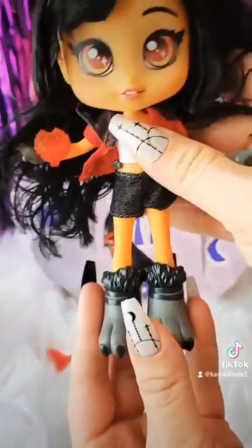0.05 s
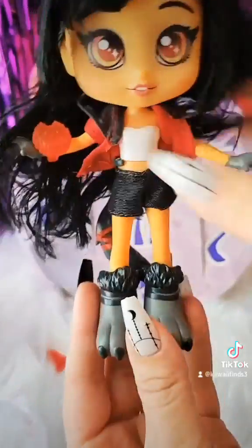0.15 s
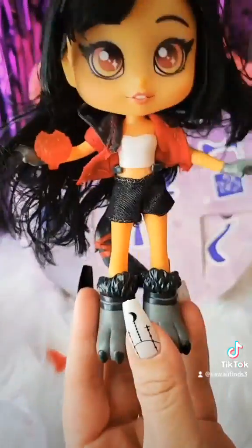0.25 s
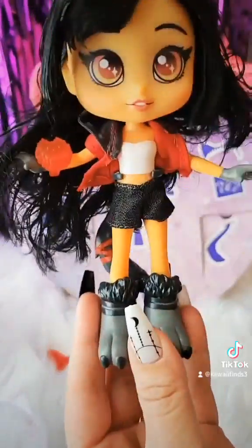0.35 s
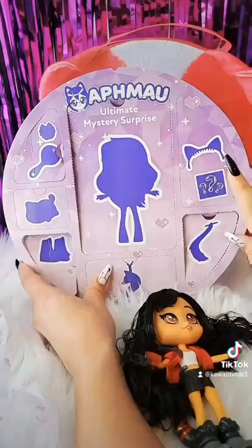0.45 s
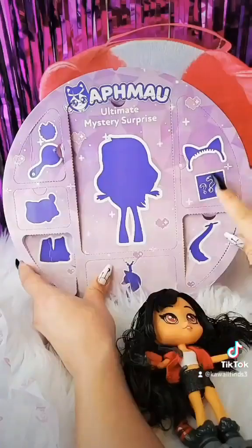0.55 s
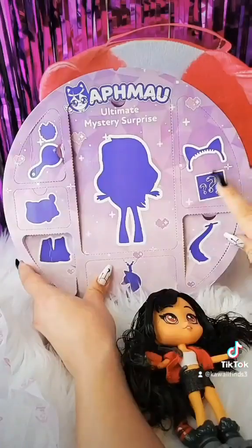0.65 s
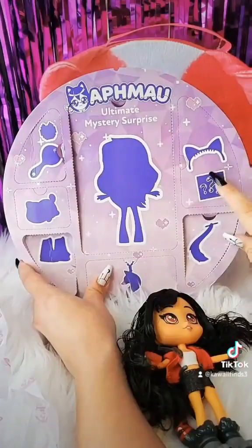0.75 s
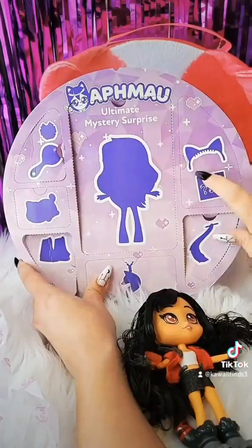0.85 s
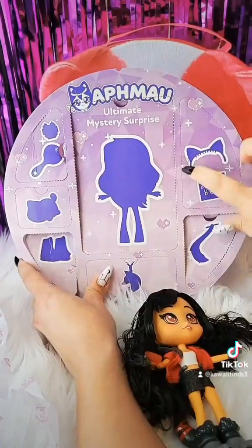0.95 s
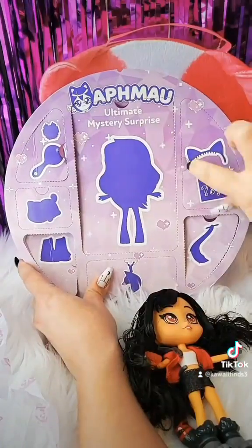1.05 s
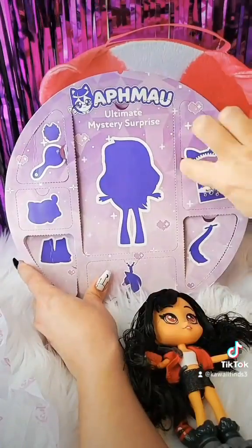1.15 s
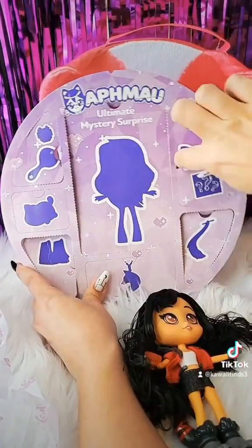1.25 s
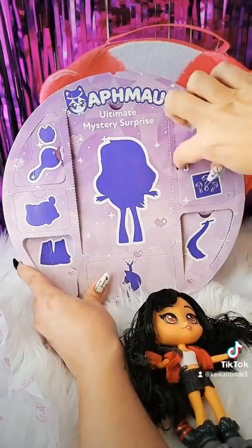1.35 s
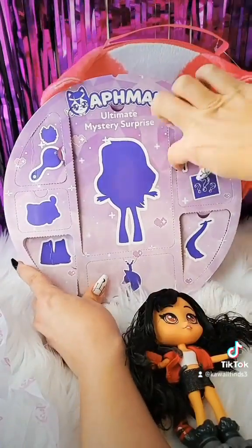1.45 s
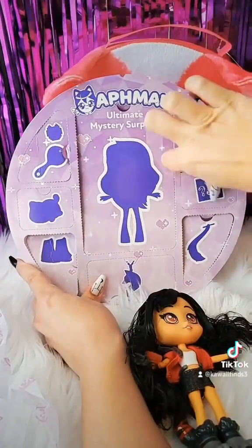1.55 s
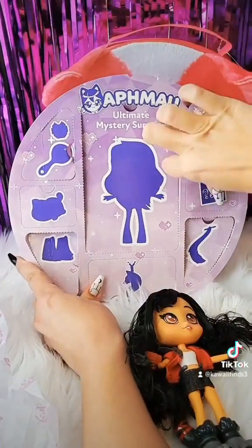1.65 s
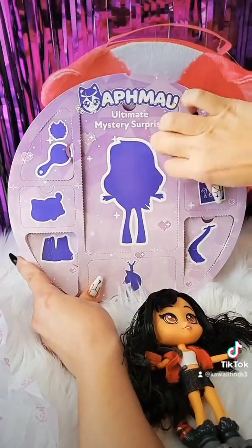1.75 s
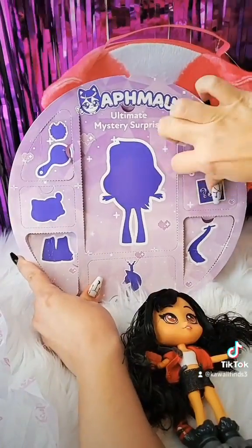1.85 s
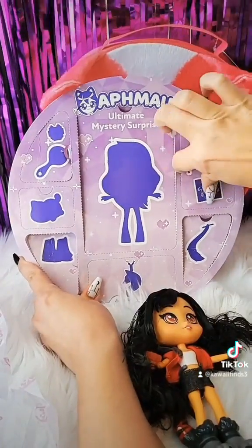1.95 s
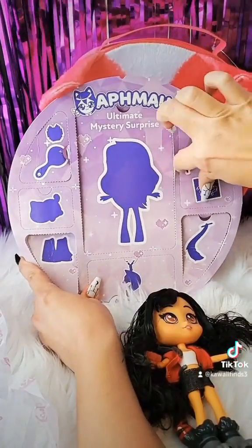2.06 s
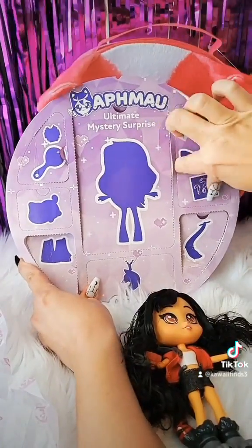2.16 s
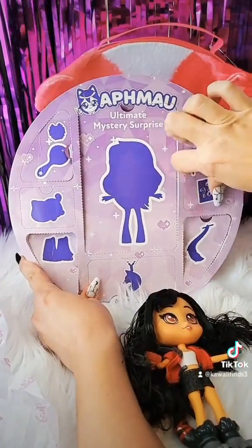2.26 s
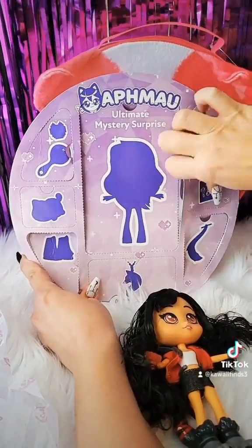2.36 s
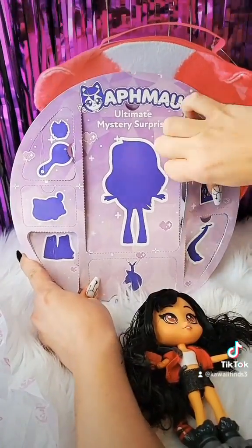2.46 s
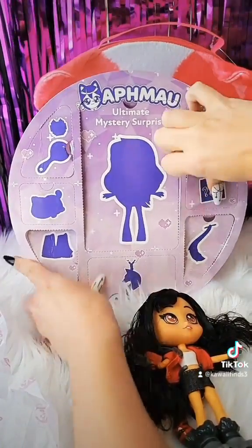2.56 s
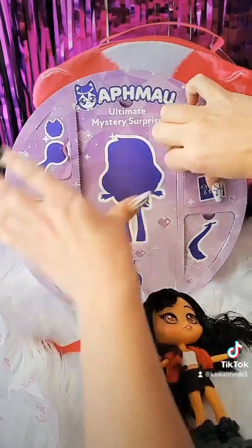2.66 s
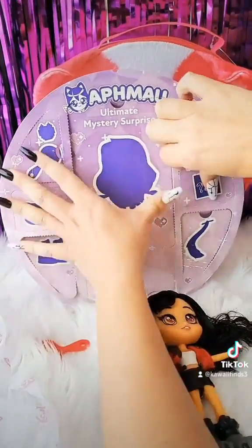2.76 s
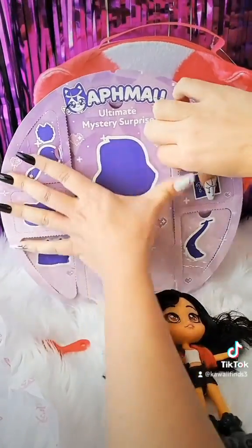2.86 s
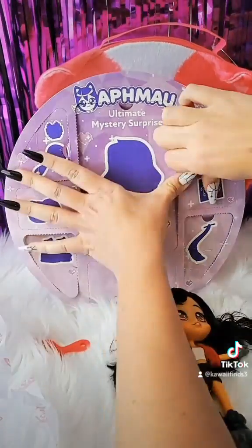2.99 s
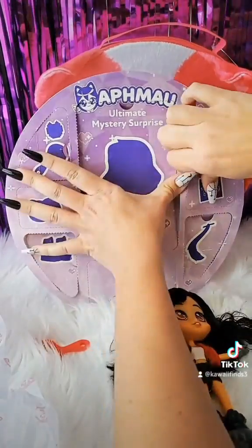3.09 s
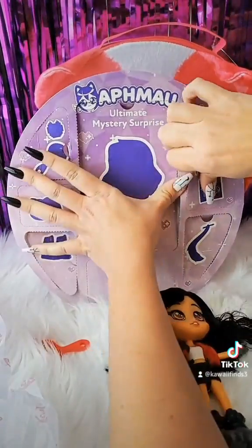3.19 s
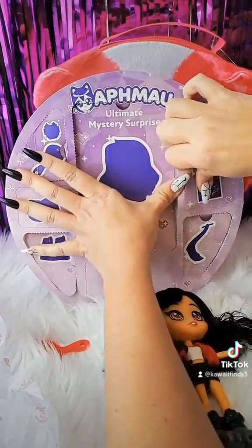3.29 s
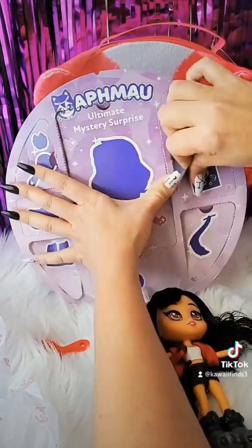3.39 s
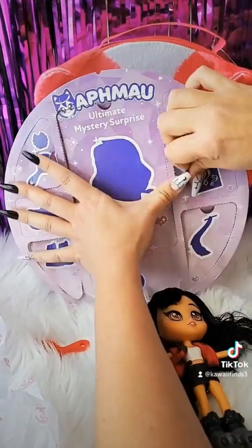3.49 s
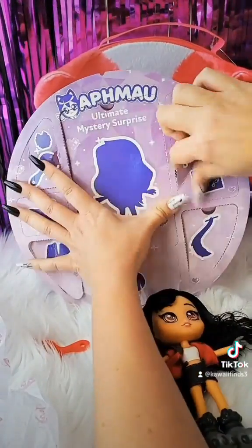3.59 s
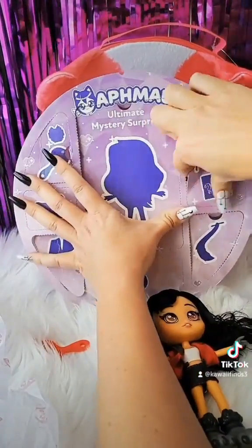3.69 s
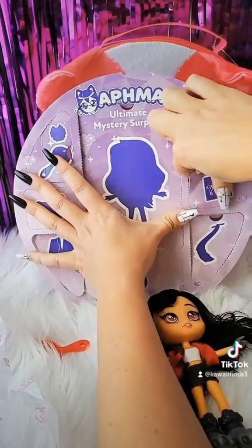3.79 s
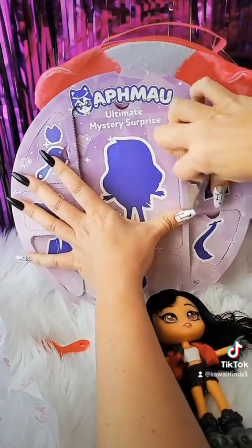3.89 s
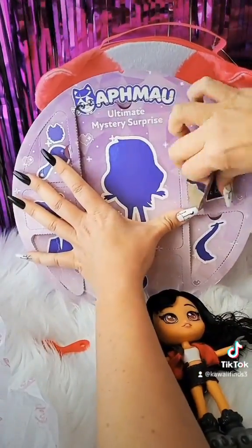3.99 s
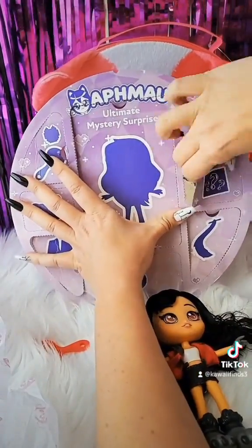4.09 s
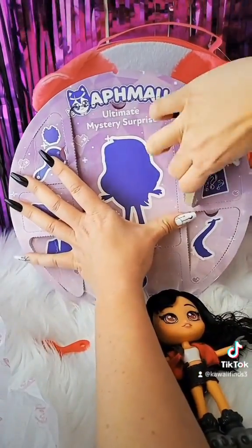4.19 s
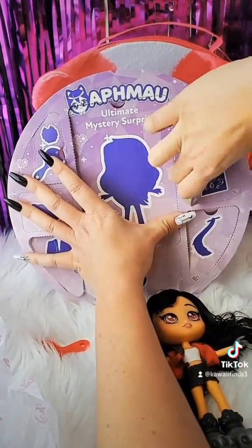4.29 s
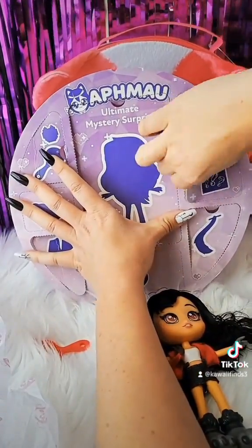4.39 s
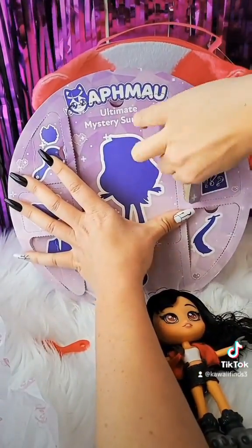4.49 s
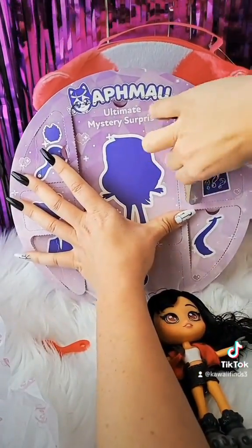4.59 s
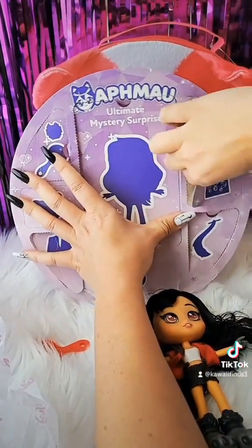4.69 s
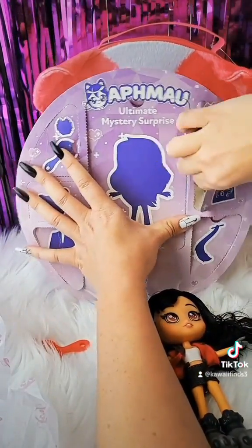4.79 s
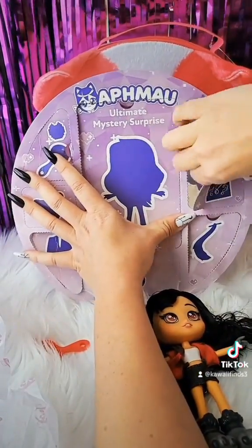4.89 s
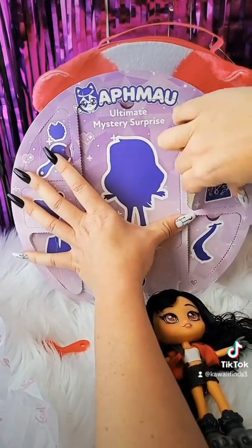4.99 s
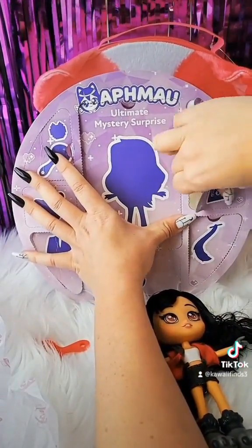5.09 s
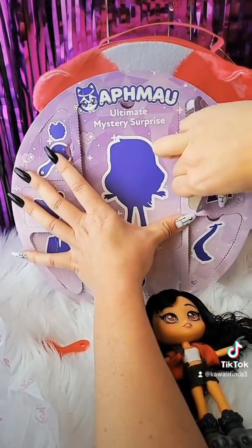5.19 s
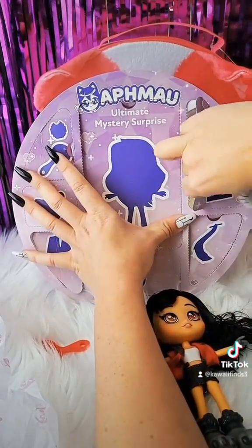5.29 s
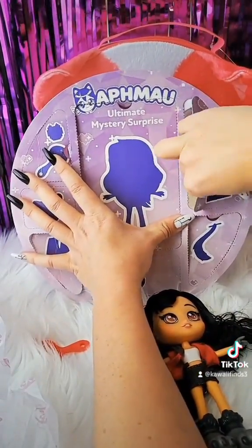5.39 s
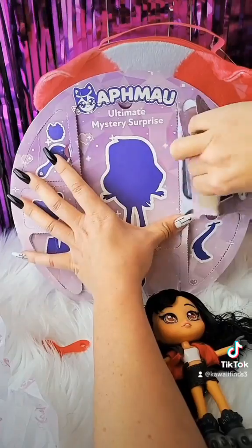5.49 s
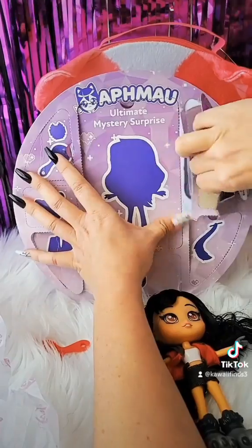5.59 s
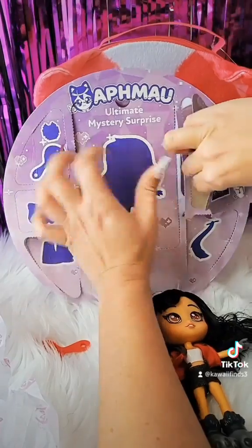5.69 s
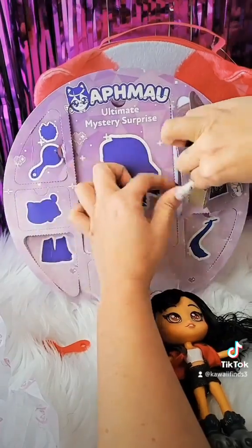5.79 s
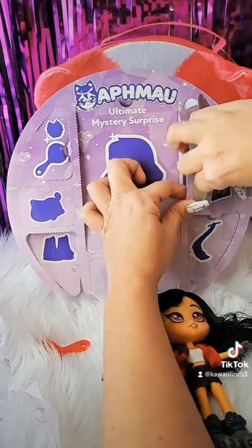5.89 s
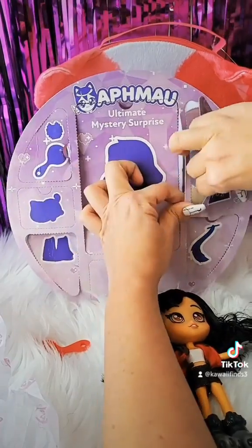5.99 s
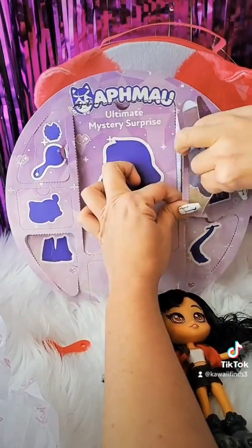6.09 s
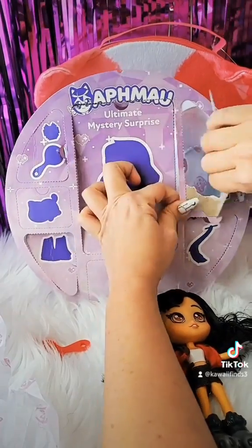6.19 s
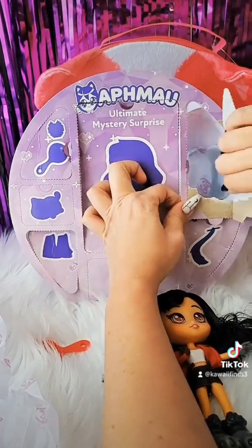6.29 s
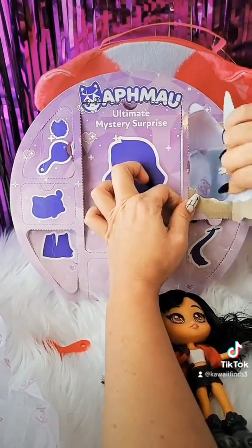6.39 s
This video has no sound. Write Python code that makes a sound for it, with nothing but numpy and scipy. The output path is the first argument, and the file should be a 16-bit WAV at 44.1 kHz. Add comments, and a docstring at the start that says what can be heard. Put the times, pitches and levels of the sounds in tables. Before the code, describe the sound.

Close cardboard handling: sharp nail taps, papery rubbing, then crisp perforation snaps and short fibrous tears, with scratchy dragging and a final click.

```python
"""Perforated card door torn open

Long fingernails tap a cardboard toy box, press in a perforated door and pull it open, in a quiet room.
Each snap is a burst of breaking fibres that rings the door and the hollow box; nail clicks ring it too.
Fingers rub by stick and slip, the door slips at every snap, torn edges catch, and peeling paper hisses.
Sine thumps flex the whole box; steady noise and a slowly changing rumble lie beneath.
"""
import sys
import numpy as np
from scipy import signal
from scipy.fft import rfft, irfft, next_fast_len
from scipy.io import wavfile

SR = 44100
rng = np.random.default_rng(int(sys.argv[2]) if len(sys.argv) > 2 else 0)


def generate_wav(signal):
    """Clip the signal to [-1, 1] and save it as 16-bit WAV at the path in sys.argv[1]."""
    frames = np.transpose(np.atleast_2d(signal))
    scaled = np.clip(frames, -1, 1) * 32767
    pcm = np.round(scaled).astype(np.int16)
    wavfile.write(sys.argv[1], SR, pcm)


N = 284445

# steady room noise, relative spectral density: f/Hz, level/dB
AIR_COLOUR = [(12, -44), (20, -20.5), (49, -15.5), (91, -28.5), (104, -7), (123, -4.5), (146, -22.5),
              (187, -40), (222, -10.5), (319, -35), (624, -40), (1260, -55.5), (1440, -38.5), (1660, -40.5),
              (16000, -46)]
AIR_DB = -78
# deep rumble before its gain: t/s, level/dB
RUMBLE_LEVEL = [(0, -78.5), (.42, -76.5), (.56, -97), (.75, -72.5), (1.3, -71.5), (2.3, -70), (3.4, -69.5),
                (4.3, -70), (4.7, -70), (5.2, -76), (6.45, -73)]
RUMBLE_GAIN_DB = 7
# relative colour of the rumble: f/Hz, level/dB
RUMBLE_COLOUR = [(20, -11.5), (33, -9.5), (45, 7.5), (60, -3), (85, -9), (122, -8), (170, -16), (300, -75)]

# how hard the fingers rub on the card: t/s, level/dB
RUBBING = [(0.0, -93.5), (0.72, -93), (0.88, -84), (1.04, -82), (1.31, -83), (1.46, -75), (2.05, -76),
           (2.24, -72.5), (2.41, -79), (3.29, -82), (4.06, -75.5), (4.2, -65), (4.51, -77), (4.65, -69),
           (4.94, -69.5), (5.17, -79), (5.51, -85.5), (5.8, -72.5), (6.05, -72), (6.45, -66.5)]
# slip of the door around each snap: level against the listed snap level, build-up, die-away
SLIP_DB, SLIP_RISE_S, SLIP_FALL_S = -26, 0.008, 0.05
# friction parts against the strength of sliding
SHUDDER_DB, SCRAPE_DB, HISS_DB = 0, -6, -3.5
# relative colour of sliding paper: f/Hz, level/dB
HISS_COLOUR = [(800, -29), (2000, -6.5), (3700, 1.5), (6000, -1), (8000, -2), (11000, -12), (15500, -5.5)]
# relative spectrum of the uneven hand speed: f/Hz, level/dB
TREMOR_COLOUR = [(5, -39.5), (20, 2), (50, -21.5), (300, -105)]
# the torn edge snags most as it drags out of the frame: t/s, level against the sliding/dB
SNAGGING = [(0, -23), (3.4, -6.5), (5.9, -13), (6.12, 1), (6.23, 5), (6.32, -23)]

# relative colour of the card: f/Hz, level/dB
CARD_COLOUR = [(60, -13), (150, -7), (250, -11), (375, -1.5), (560, -3), (700, -9), (900, -5.5), (1900, -6),
               (2700, -10.5), (3800, -8.5), (6000, -12.5), (8400, -20.5), (10500, -26), (15500, -19)]
# resonances of the hollow box: f/Hz, width/Hz, level over the card's colour at left port/dB, at right port/dB
BOX_MODES = [(375.2, 32, 1.5, 4), (524, 65, 1.5, 5), (780, 34, 10.5, 4.5), (898, 89, 10.5, -0.5),
             (1174, 47, 6.5, 3), (1450, 150, 4, 5), (1737, 30, -12, 6.5), (2144, 34, -11.5, 5.5),
             (3590, 110, 3.5, 3), (6170, 140, -11.5, 7)]
# bands of a burst (thud, knock, crack, fizz): low f/Hz, high f/Hz
BANDS = [(130, 600), (600, 2500), (2500, 8000), (8000, 16000)]
# likeness of a burst at the two microphone ports: f/Hz, likeness/0-1
LIKENESS = [(100, 1), (400, 1), (1000, 0.97), (3000, 0.68), (6000, 0.71), (15000, 0)]

# a nail or stiff edge strikes the card:
# t/s, level/dB, brightness/(dB per octave), die-away/s, panel ring f/Hz
CLICKS = [(0.4807, -82.5, 9.5, 0.0024, 3700), (0.6742, -37.5, 0.55, 0.0042, 870),
          (0.758, -41.5, -0.95, 0.0096, 900), (0.8624, -34.5, -0.5, 0.0029, 895),
          (0.887, -70, 2, .002, 3200), (1.601, -70, 3.5, 0.0084, 3330), (2.864, -55, -1.6, 0.0053, 1110),
          (3.093, -66.5, 3, 0.012, 3930), (3.119, -63, 4.5, 0.0037, 1750), (3.185, -72.5, -3, .008, 1710),
          (3.327, -70.5, -1.5, .005, 1710), (4.519, -32.5, -2.3, 0.0033, 1740),
          (4.533, -29.5, -3, 0.0036, 1880), (4.5478, -32, -4, 0.005, 974), (4.773, -59.5, 4.5, 0.011, 3650),
          (5.321, -65.5, -6, 0.005, 1200), (5.817, -52, -2, 0.01, 1220), (5.867, -59.5, -4, 0.0036, 1190),
          (6.083, -57, 2.7, 0.0098, 3730), (6.135, -64, 4.5, .003, 4200), (6.224, -58, 3, 0.0035, 3500),
          (6.2522, -34, 1, 0.0029, 2420)]
CLICK_RISE_S = 0.0013
# band levels against the click level: thud/dB, knock/dB, crack/dB, fizz/dB
CLICK_SHAPE_DB = [-10, -1, -3, -10.5]
# the whole box gives under the hand: t/s, level/dB, f/Hz, die-away/s
THUMPS = [(0.485, -49.5, 70, 0.016), (1.702, -39.5, 140, 0.0063), (3.508, -40, 141, .009),
          (3.736, -50, 162, 0.02), (4.061, -44, 141, 0.011), (4.661, -39.5, 132, 0.0099),
          (5.657, -45, 126, 0.0093), (6.309, -41.5, 155.5, 0.013), (6.349, -49.5, 167, 0.018)]
# the card buckles or a bridge breaks: t/s, knock level before trim/dB, thud against knock/dB,
# brightness/(dB per octave), build-up/s, die-away/s, panel ring f/Hz
SNAPS = [(0.931, -67.5, 0, 2, 0.011, 0.03, 765), (0.997, -46.5, -4, -1.1, 0.0098, 0.0098, 1260),
         (1.018, -52.5, -12, -0.2, 0.0059, 0.0083, 1120), (1.066, -65.5, 6, 1, 0.0032, 0.0037, 384),
         (1.267, -56, 3, 1.5, .012, 0.016, 800), (1.287, -50, 4, 3, 0.0047, .0066, 377),
         (1.706, -63, 7.5, -5, 0.014, 0.016, 640), (2.07, -70, 9, 2.5, 0.044, 0.061, 400),
         (2.147, -59.5, 7.5, -5.5, 0.011, 0.0089, 347), (2.259, -51.5, 1.5, -1.5, 0.016, 0.018, 378),
         (2.297, -61.5, 12, -2, 0.01, 0.0056, 310), (2.35, -63, -1, -0.5, .02, 0.037, 1390),
         (2.503, -78.5, 13.5, -1, 0.0099, 0.017, 400), (2.628, -67.5, -2, 1.5, 0.014, 0.0075, 1880),
         (2.718, -60, -1, 3.5, 0.019, 0.011, 605), (2.755, -63.5, 6.5, 1.5, 0.019, 0.0094, 288),
         (3.507, -38.5, 4, 5.5, .002, 0.0095, 460), (3.568, -46.5, -1.5, -1.5, 0.0056, 0.0078, 1090),
         (3.739, -49, 9, 2, 0.0057, 0.0093, 510), (4.036, -56.5, 5.5, 6, 0.012, 0.01, 396),
         (4.0561, -34, -0.5, 4, 0.0012, 0.0083, 527), (4.067, -39, 7.5, 3.5, 0.009, 0.0022, 530),
         (4.16, -67, 1, -19, .02, 0.044, 810), (4.242, -37, -11.5, 1.2, 0.0045, 0.0095, 1000),
         (4.409, -53.5, 0.5, 2, 0.006, 0.0083, 473), (4.603, -44.5, -1.5, -0.5, .0025, 0.0062, 960),
         (4.662, -44, 7.5, -1.5, 0.0034, 0.0038, 450), (4.832, -44, 0, -2.5, 0.0089, 0.0025, 970),
         (4.935, -51.5, -2, 1.5, 0.0045, 0.023, 760), (4.965, -26.5, 7, -1.1, 0.0027, 0.0042, 376),
         (4.971, -34.5, 4, .5, 0.006, 0.0067, 360), (4.997, -51, -2, 3, .012, .004, 892),
         (5.045, -55, 6, 0.5, 0.003, 0.0092, 575), (5.116, -58.5, -3, 0.5, 0.012, 0.018, 460),
         (5.472, -68, -1.5, 1.5, .014, 0.014, 1150), (5.658, -42.5, 3.5, -4, 0.006, 0.0085, 690),
         (5.756, -61, 9.5, -1.5, 0.0035, 0.0076, 416), (5.93, -66, 6.5, 3.5, .002, 0.0091, 352),
         (5.984, -46, 4, -0.5, 0.0014, 0.0046, 490), (6.046, -60, 0, 3, .004, 0.0094, 465),
         (6.238, -46.5, -12, 2.5, 0.0012, 0.0075, 2130), (6.315, -40, -4.5, 1.4, 0.0068, 0.0064, 960),
         (6.357, -53, -3, 6.5, .004, 0.014, 1240)]
# treble of a snap against its knock, before brightness
SNAP_CRACK_DB, SNAP_FIZZ_DB = -8.5, -18
SNAP_TRIM_DB = -1.41
# paper layers peel apart: t/s, level/dB, build-up/s, die-away/s
RIPS = [(1.288, -53.5, 0.0057, 0.0056), (1.82, -72, 0.087, 0.008), (2.258, -55.5, 0.0087, 0.022),
        (2.41, -62.5, 0.031, 0.019), (2.772, -67, 0.019, 0.049), (3.19, -74.5, 0.074, 0.023),
        (3.885, -67.5, 0.0052, 0.0045), (3.748, -49.5, .008, 0.03), (4.037, -54.5, 0.0086, 0.019),
        (4.072, -41.5, 0.0063, 0.011), (4.204, -54.5, .012, 0.029), (4.245, -50, 0.025, 0.028),
        (4.438, -60.5, 0.025, 0.023), (4.689, -58.5, .012, 0.043), (4.801, -59, 0.021, 0.036),
        (4.972, -43, 0.0094, .013), (5.11, -67, 0.028, 0.029), (5.656, -50.5, 0.016, 0.014),
        (6.344, -50, 0.024, 0.048), (6.418, -52.5, 0.018, 0.022)]
# relative colour of peeling paper: f/Hz, level/dB
PEEL_COLOUR = [(300, -20.5), (900, 0), (2000, -4.5), (3700, 0.5), (6000, -3), (8000, -7.5), (11000, -7),
               (15500, -5.5)]

# decay of the room's far tail: f/Hz, t60/s
ROOM_T60 = [(150, 0.36), (500, 0.12), (2000, 0.39), (6000, 0.05), (15000, 0.056)]
# the right port faces the door: f/Hz, left minus right/dB
FACING = [(150, 0.5), (400, -0.5), (900, -1.5), (2200, -2.5), (3500, -2.5), (5500, -3.5), (9000, 0),
          (14000, 1)]
EDGE_HZ = 16250


def amp(db):
    """Decibels to gain."""
    return 10 ** (np.asarray(db) / 20)


def unit(x):
    """Scales to rms 1."""
    return x / np.sqrt(np.mean(x ** 2) + 1e-20)


def read(points, hz):
    """Reads a table on a log-frequency axis."""
    f_hz, value = np.transpose(points)
    return np.interp(np.log(hz + 1), np.log(f_hz + 1), value)


def curve(points):
    """Reads a table against time, once per sample."""
    return np.interp(np.arange(N) / SR, *np.transpose(points))


def freqs(size):
    """Frequencies in Hz of a spectrum of that many samples."""
    return np.fft.rfftfreq(size, 1 / SR)


def padded_size():
    """Even, fast transform length that holds the scene."""
    return 2 * next_fast_len(N // 2 + 1)


def add(mix, start_s, sound):
    """Mixes a stereo sound in at its start time."""
    part = mix[:, max(round(start_s * SR), 0):][:, :sound.shape[1]]
    part += sound[:, :part.shape[1]]


def sides(left_minus_right_db):
    """Left and right gains for a level difference, at constant power."""
    half_db = left_minus_right_db / 2
    return unit(amp([[half_db], [-half_db]]))


def ports(spectra, likeness):
    """Blends two unrelated spectra into a partly alike pair."""
    likeness = np.clip(likeness, 0, 1)
    shared = np.sqrt((1 + likeness) / 2) * spectra[0]
    apart = np.sqrt((1 - likeness) / 2) * spectra[1]
    return np.array([shared + apart, shared - apart])


def background():
    """Faint steady room noise over a deep, slowly changing rumble."""
    hz = freqs(N)
    likeness = read([(150, 0.91), (1000, 0.43), (5000, 0.056)], hz)
    air = ports(rfft(rng.standard_normal((2, N))), likeness)
    air = unit(irfft(air * amp(read(AIR_COLOUR, hz)), N))
    deep = ports(rfft(rng.standard_normal((2, N))), 0.92)
    deep = unit(irfft(deep * amp(read(RUMBLE_COLOUR, hz)), N))
    rumble = deep * amp(curve(RUMBLE_LEVEL) + RUMBLE_GAIN_DB)
    return amp(AIR_DB) * air + rumble * sides(-1.7)


def swell(t_s, rise_s, fall_s):
    """Exponential build-up to a peak at t = 0, then exponential die-away."""
    shortest_s = 1 / 3000
    away = np.maximum(-t_s / max(rise_s, shortest_s), t_s / max(fall_s, shortest_s))
    return np.exp(-np.minimum(away, 20))


def swells(rows, step=32):
    """Gain over time of overlapping swells (t/s, level/dB, build-up/s, die-away/s); powers add."""
    t_s = np.arange(0, N + step, step) / SR  # coarse grid
    power = sum((amp(db) * swell(t_s - s, rise_s, fall_s)) ** 2 for s, db, rise_s, fall_s in rows)
    return np.interp(np.arange(N) / SR, t_s, np.sqrt(power))


def sliding():
    """Strength of friction: the fingers rub, and the door slips at each snap."""
    slips = swells([(s, db + SLIP_DB, SLIP_RISE_S, SLIP_FALL_S) for s, db, *_ in SNAPS])
    return np.hypot(amp(curve(RUBBING)), slips)


def fibres(size, per_s, spread_db):
    """Two trains of tiny fractures at random times: many faint, a few strong."""
    chance = rng.random((2, size))
    strength = rng.exponential(1, (2, size))
    sign = rng.choice([-1, 1], (2, size))
    broken = chance < per_s / SR
    return unit(sign * broken * amp(spread_db * np.minimum(strength, 4)))


def causal(db):
    """Minimum-phase response with this gain: it rings only after it is struck."""
    mirrored_db = np.concatenate([db, db[..., -2:0:-1]], axis=-1)
    log_gain = np.log(amp(mirrored_db))
    return np.exp(np.conj(signal.hilbert(log_gain)))[..., :db.shape[-1]]


def card_db(hz, modes):
    """Card colour at both ports, with resonances on top; a small panel radiates no deep bass."""
    peaks = 0
    for f_hz, width_hz, left_db, right_db in modes:
        height = amp([[left_db], [right_db]]) ** 2
        peaks = peaks + height / (1 + (2 * (hz - f_hz) / width_hz) ** 2)
    radiation = 1 / (1 + (75 / np.maximum(hz, 10)) ** 4)
    return read(CARD_COLOUR, hz) + 10 * np.log10((1 + peaks) * radiation)


def friction(grains, colour_db, likeness, pan_db):
    """Colours two trains of grains into a stereo sound: rms 1, then panned."""
    spectrum = ports(rfft(grains), likeness) * causal(colour_db)
    return unit(irfft(spectrum)[:, :N]) * sides(pan_db)


def tremor(depth_db):
    """Gain of a hand that never slides at an even speed: shaped noise of that rms depth."""
    noise = rfft(rng.standard_normal(N)) * amp(read(TREMOR_COLOUR, freqs(N)))
    return amp(depth_db * unit(irfft(noise, N)))


def rubbing(slide):
    """Stick and slip: coarse slips shake the box, finer ones scrape and hiss."""
    size = padded_size()
    hz = freqs(size)
    card = card_db(hz, BOX_MODES)
    low_db = card + read([(120, 15.5), (260, 3), (550, -7.5), (1100, -31.5)], hz)
    middle_db = card + read([(300, -18), (650, 3.5), (2200, 0.5), (4000, -28)], hz)
    coarse = fibres(size, per_s=600, spread_db=5)
    shudder = friction(coarse, low_db, likeness=0.99, pan_db=-1.5)
    fine = fibres(size, per_s=970, spread_db=3)
    scrape = friction(fine, middle_db, likeness=0.23, pan_db=-3.5)
    noise = rng.standard_normal((2, size))
    hiss = friction(noise, read(HISS_COLOUR, hz), likeness=0.082, pan_db=1.5)
    rub = amp(SHUDDER_DB) * shudder + amp(SCRAPE_DB) * scrape + amp(HISS_DB) * hiss
    return rub * slide * tremor(depth_db=2)


def catches(slide, per_s=60, spread_db=0.8, creak_s=0.0078):
    """A torn edge catches at random as it slides, and lets go with a tiny decaying scratch."""
    size = padded_size()
    hz = freqs(size)
    keep = np.exp(-1 / (creak_s * SR))
    releases = abs(fibres(size, per_s, spread_db)[0])
    envelope = signal.lfilter([1], [1, -keep], releases)
    tilt_db = read([(300, -17), (1200, 0.5), (3500, 0), (6500, 2.5), (12000, -11.5)], hz)
    scratches = envelope * rng.standard_normal((2, size))
    sound = friction(scratches, card_db(hz, BOX_MODES) + tilt_db, likeness=0.75, pan_db=-2)
    return amp(curve(SNAGGING)) * slide * sound


def spot_db(hz, depth_db, count=16):
    """Each spot favours its own plate modes: a random ripple along the spectrum, fuller in the treble."""
    ripples = np.linspace(1, 5, count) * np.sqrt(hz / 500)[:, None]
    waves = np.cos(2 * np.pi * (ripples + rng.random(count))).sum(axis=1)
    return depth_db * unit(waves) * hz / (hz + 600)


def bending(hz, travel_s):
    """Bending waves cross the card faster the higher they are; travel_s holds at 1 kHz."""
    return np.exp(-4j * np.pi * travel_s * np.sqrt(hz * 1000))


def burst(s, db, brightness, rise_s, fall_s, ring_hz, shape_db, blow, ring_db, ring_q, spread_db,
          size=9216):
    """Fractures crowd up to one sharp release and thin out; they ring the panel and the box."""
    lead_s = 1 / 12  # room for the build-up
    t_s, hz = np.arange(size) / SR - lead_s, freqs(size)
    drive = fibres(size, per_s=5500, spread_db=spread_db) * swell(t_s, rise_s, fall_s)
    drive = rfft(drive / (np.linalg.norm(drive[0]) + 1e-9))
    # only a quick release makes a clean click; it also shoves the whole panel
    shove = 1 + 0.29 / (1 + (hz / 800) ** 2)
    at_peak = np.exp(-2j * np.pi * hz * lead_s)
    drive[0] += blow * np.exp(-rise_s / 0.005) * shove * at_peak

    panel = (ring_hz, ring_hz / ring_q, ring_db, ring_db)
    colour_db = card_db(hz, BOX_MODES + [panel]) + spot_db(hz, depth_db=0.5)
    spectrum = ports(drive, read(LIKENESS, hz)) * causal(colour_db)
    spectrum = spectrum * bending(hz, travel_s=0.000748)

    # a stiffer spot adds crack and fizz above the knock
    centres_hz = np.sqrt(np.prod(BANDS, axis=1))
    octaves_up = np.maximum(np.log2(centres_hz / centres_hz[1]), 0)
    levels_db = db + np.array(shape_db) + brightness * octaves_up
    wanted = amp(levels_db) ** 2 * (rise_s + fall_s) * SR * size / 4
    tilt_db = np.zeros(len(hz))
    for _ in BANDS:  # bands overlap in the tilt, so approach their energies in rounds
        power = np.mean(abs(spectrum) ** 2, axis=0) * amp(tilt_db) ** 2
        held = np.array([power[(hz >= lo) & (hz < hi)].sum() for lo, hi in BANDS])
        tilt_db = tilt_db + read(np.c_[centres_hz, 10 * np.log10(wanted / held)], hz)
    return s - lead_s, irfft(spectrum * causal(tilt_db))


def clicks():
    """Hard nail tips and stiff edges click on the lid: short bursts with a long panel ring."""
    out = np.zeros((2, N))
    for s, db, brightness, fall_s, ring_hz in CLICKS:
        start_s, click = burst(s, db, brightness, CLICK_RISE_S, fall_s, ring_hz, CLICK_SHAPE_DB,
                               blow=0.62, ring_db=12.5, ring_q=8.7, spread_db=5)
        add(out, start_s, click)
    return out * sides(-0.054)


def thumps():
    """The box flexes on its soft support: a few dull sine cycles."""
    out = np.zeros((2, N))
    t_s = np.arange(SR // 4) / SR
    for s, db, hz, fall_s in THUMPS:
        push = (1 - np.exp(-t_s / 0.00079)) * np.exp(-t_s / fall_s)
        add(out, s, amp(db) * push * np.sin(2 * np.pi * hz * t_s) * sides(-0.5))
    return out


def perforation():
    """The door creaks in and its paper bridges break in turn; the fingers keep its ring short."""
    out = np.zeros((2, N))
    for s, db, thud_db, brightness, rise_s, fall_s, ring_hz in SNAPS:
        shape_db = [thud_db, 0, SNAP_CRACK_DB, SNAP_FIZZ_DB]
        start_s, snap = burst(s, db, brightness, rise_s, fall_s, ring_hz, shape_db,
                              blow=1, ring_db=10.5, ring_q=5, spread_db=3)
        add(out, start_s, snap)
    return out * amp(SNAP_TRIM_DB) * sides(-0.78)


def peeling():
    """Countless fine fibres pull out as the layers of paper part."""
    size = padded_size()
    grains = fibres(size, per_s=4000, spread_db=1)
    fizz = friction(grains, read(PEEL_COLOUR, freqs(size)), likeness=0.28, pan_db=0.6)
    return fizz * swells(RIPS) * tremor(depth_db=2.5)


def room(x, near_db, near_s, far_db, size=16384):
    """Quick sparse scatter from the table and backdrop, plus the faint tail of a soft room."""
    t_s = np.arange(size) / SR
    near, far = rng.standard_normal((2, 2, size)) * (t_s > 0.004)
    near = near * np.exp(-t_s / near_s) * (rng.random((2, size)) < 0.08)
    hz, frames_s, spectrum = signal.stft(far, SR, nperseg=256)
    decay = amp(-60 * frames_s / read(ROOM_T60, hz)[:, None])
    far = signal.istft(spectrum * decay, SR, nperseg=256)[1][:, :size]
    echo = (amp(near_db) * unit(near) + amp(far_db) * unit(far)) / np.sqrt(size)
    return x + signal.fftconvolve(x, echo, axes=1)[:, :N]


def scene():
    """The box and the hands in the room."""
    slide = sliding()
    taps = room(clicks(), near_db=-15.5, near_s=0.013, far_db=-28)
    tears = room(perforation() + peeling(), near_db=-9, near_s=0.014, far_db=-29)
    hands = taps + tears + catches(slide) + rubbing(slide)
    facing = amp(np.outer([0.5, -0.5], read(FACING, freqs(N))))
    return irfft(rfft(hands) * facing, N) + thumps() + background()


def record(dry):
    """The phone's band limit: a linear-phase low-pass."""
    low_pass = signal.firwin(511, EDGE_HZ, window=("kaiser", 9), fs=SR)
    return signal.oaconvolve(dry, low_pass[None], "same", axes=1)


dry = scene()
out = record(dry)
generate_wav(out)
```